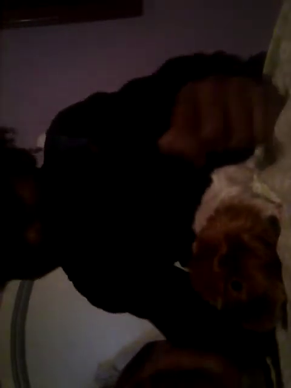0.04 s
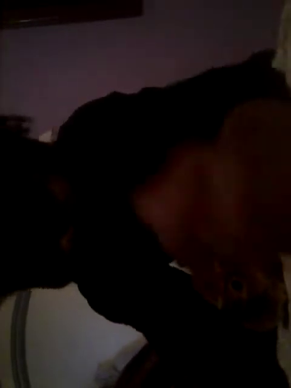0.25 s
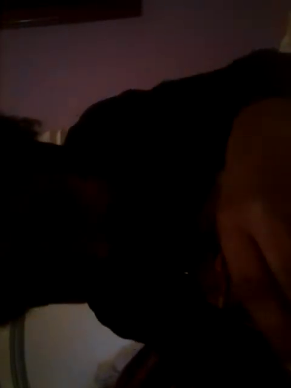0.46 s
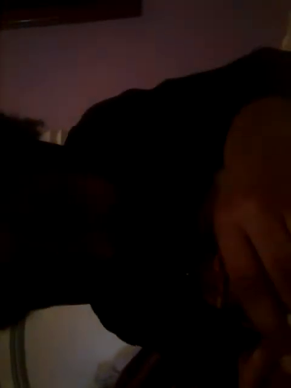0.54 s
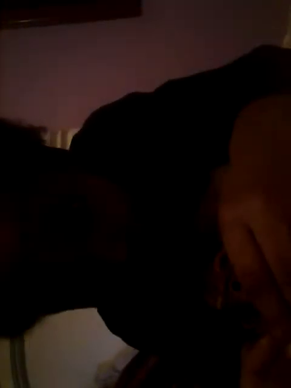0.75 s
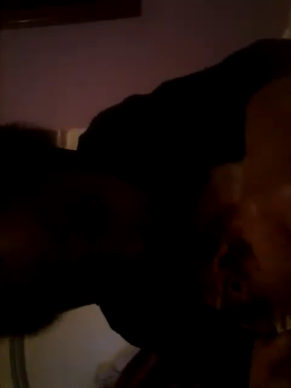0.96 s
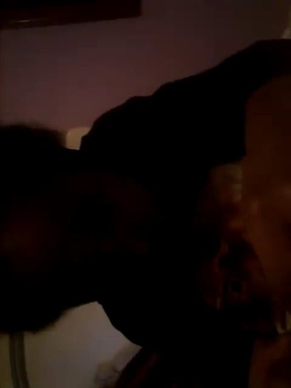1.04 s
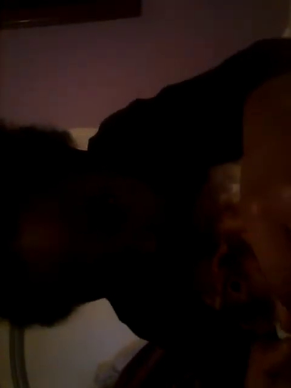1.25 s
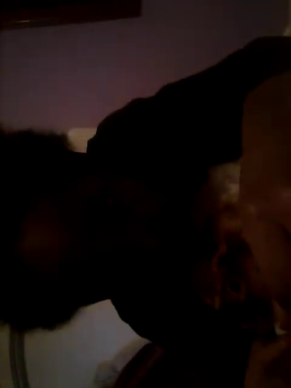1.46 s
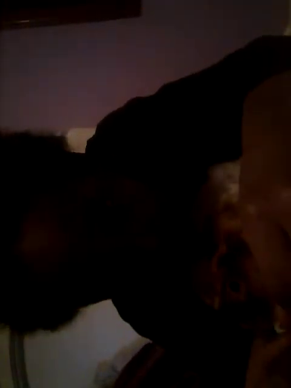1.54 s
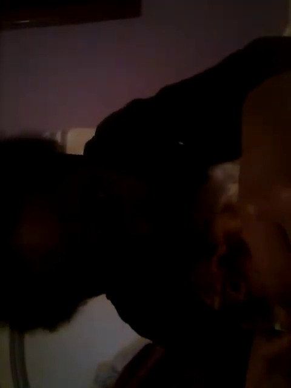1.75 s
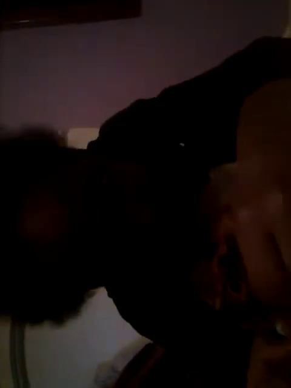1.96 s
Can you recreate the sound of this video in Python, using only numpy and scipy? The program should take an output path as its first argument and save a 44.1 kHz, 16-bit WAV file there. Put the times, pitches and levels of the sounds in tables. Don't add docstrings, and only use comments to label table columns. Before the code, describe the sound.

A guinea pig squeals four rising whistles close to the microphone in a quiet bedroom.

```python
import sys
import numpy as np
from scipy import signal
from scipy.fft import rfft, irfft, next_fast_len
from scipy.io import wavfile
from scipy.ndimage import uniform_filter1d

SR = 44100
rng = np.random.default_rng(int(sys.argv[2]) if len(sys.argv) > 2 else 0)


def how_loud(loudness_db):
    steps = np.asarray(loudness_db, float) / 20
    return 10 ** steps


def unload_audio(sound):
    columns = np.transpose(np.atleast_2d(sound))
    steps = np.round(np.clip(columns, -1, 1) * 32767)
    wavfile.write(sys.argv[1], SR, steps.astype(np.int16))


N = 88376


def at_hz(points, hz):
    table = np.array(points)
    return np.interp(np.log(hz), np.log(table[:, 0]), table[:, 1])


def rms_one(x):
    return x / np.sqrt(np.mean(x ** 2) + 1e-20)


def drift(rate_hz):
    pole = np.exp(-2 * np.pi * rate_hz / SR)
    wander = signal.lfilter([1], [1, -2 * pole, pole * pole], rng.standard_normal(N + SR))
    return rms_one(wander[SR:])


def bump(at_s, width_s):
    return np.exp(-.5 * ((np.arange(N) / SR - at_s) / width_s) ** 2)


def shaped(x, gain_at):
    size = next_fast_len(N + SR)
    hz = np.maximum(np.fft.rfftfreq(size, 1 / SR), 1)
    return irfft(rfft(x, size) * gain_at(hz), size)[..., :N]


# time in seconds, pitch in Hz, level in dB, second partial in dB re first,
# higher partials in dB re first.
CHIRP = [(0.005, 853, -39.5, -24.5, -45.5), (0.018, 770, -48, -18, -37), (.03, 744, -37, -21.5, -32.5),
         (0.04, 787, -44.5, -26, -31), (0.05, 932, -43.5, -15.5, -36.5), (0.056, 926, -41, -23.5, -38.5),
         (.061, 824, -47, -25, -42.5)]
FIRST_LEAD = [(.091, 1024, -35.5, -38, -33), (0.101, 1010, -28.5, -35.5, -36),
              (0.112, 1243, -27, -22.5, -38.5), (0.135, 1321, -23, -18.5, -20)]
FIRST = [(0.136, 1201, -20, -14.5, -21), (0.145, 1200, -21, -15, -22.5), (0.162, 1248, -20, -14.5, -17.5),
         (0.226, 1646, -25, -10, -13.5), (0.243, 1790, -22.5, -23, -18.5), (0.28, 1957, -25, -20.5, -23),
         (0.307, 2029, -23.5, -27, -27), (0.349, 2031, -27.5, -27, -30.5)]
SECOND_LEAD = [(.5155, 1300, -46, -20, -30), (.5185, 1280, -25, -16, -17), (.5198, 830, -32, -4, -11),
               (.5235, 790, -32, 2, -11), (.5275, 815, -30, -1, -12), (.5305, 960, -21, -12, -17)]
SECOND = [(0.531, 991, -18.5, -17.5, -22), (0.546, 995, -15.5, -12, -23.5), (.567, 1146, -16, -17, -36),
          (0.589, 1182, -14.5, -25, -26.5), (0.621, 1381, -15.5, -15.5, -30.5),
          (.642, 1437, -16.5, -18, -30.5), (0.679, 1635, -16.5, -14.5, -19),
          (0.731, 1788, -21.5, -9, -25.5), (.754, 1846, -28, -17, -32.5)]
THIRD_LEAD = [(0.953, 1444, -45.5, -42, -31.5), (.964, 1258, -55, -39.5, -34.5),
              (0.973, 1158, -25.5, -13.5, -30), (0.979, 1210, -25, -22.5, -27.5)]
THIRD = [(0.981, 1217, -22, -15.5, -31.5), (1.011, 1183, -21, -13.5, -24), (1.05, 1194, -20, -13.5, -22.5),
         (1.085, 1238, -20, -11.5, -23.5), (1.111, 1329, -19, -12.5, -19), (1.136, 1548, -19, -11, -16.5),
         (1.167, 1697, -19.5, -16.5, -22), (1.214, 1827, -26, -16, -23), (1.23, 1853, -32, -21, -36)]
FOURTH_LEAD = [(1.553, 1107, -54, -22, -38), (1.574, 1102, -40.5, -37.5, -40),
               (1.575, 1062, -30, -16, -24.5)]
FOURTH = [(1.58, 1061, -24.5, -6, -28), (1.608, 1004, -24, -9.5, -21.5), (1.625, 905, -26, -12.5, -18),
          (1.665, 923.2, -24, -15, -22), (1.706, 1037, -24.5, -10, -30), (1.746, 1193, -29, -7, -28),
          (1.78, 1217, -28, -10.5, -33), (1.827, 1376, -27.5, -14.5, -35.5), (1.847, 1373, -28, -25, -38)]


def larynx():
    release_s, release_db = .014, -19
    snap_s, glide_s = .001, .01
    edge_s = 0.00047
    t = np.arange(N) / SR
    calls = []
    for call in (CHIRP, FIRST_LEAD + FIRST, SECOND_LEAD + SECOND, THIRD_LEAD + THIRD, FOURTH_LEAD + FOURTH):
        release = np.add(call[-1], [release_s, 0, release_db, 0, 0])
        calls.append(list(call) + [release])
    rows = sorted(sum(calls, []), key=lambda row: row[0])
    row_s, *columns = np.transpose(rows)
    curves = [uniform_filter1d(np.interp(t, row_s, c), size=int(snap_s * SR)) for c in columns]
    pitch, level_db, second_db, upper_db = curves
    settled = sum((t > c[0][0] + glide_s) & (t < c[-1][0]) for c in (CHIRP, FIRST, SECOND, THIRD, FOURTH))
    pitch = np.where(settled, uniform_filter1d(pitch, size=int(glide_s * SR)), pitch)
    gate = sum(np.clip(np.minimum(t - c[0][0], c[-1][0] - t) / edge_s, 0, 1) for c in calls)
    return pitch, level_db, second_db, upper_db, gate


# time in seconds, length in seconds, raggedness in dB.
BREAKS = [(.134, .002, -19), (.5187, .001, -20), (.524, .004, -29), (.53, .0015, -21), (.618, .002, -19),
          (.979, .002, -21), (1.577, .0012, -17), (1.616, .004, -19), (1.65, .025, -30), (1.679, .005, -25)]


def voice_breaks():
    return sum(how_loud(db) * bump(at_s, length_s) for at_s, length_s, db in BREAKS)


def period_doubling():
    from_s, to_s, edge_s = 1.616, 1.678, .005
    t = np.arange(N) / SR
    return np.clip(np.minimum(t - from_s, (to_s - t) / 2) / edge_s + .5, 0, 1)


# multiple of the pitch, level in dB re first.
HALF_LINES = [(.5, -27), (1.5, -13), (2.5, -17), (3.5, -25), (4.5, -23), (5.5, -31), (6.5, -43)]


def half_lines(phase, doubled):
    t = np.arange(N) / SR
    sag_db = -250 * np.clip(t - 1.655, 0, 1)
    lines = 0
    for multiple, db in HALF_LINES:
        lines = lines + how_loud(db + 0.93 * drift(40)) * np.cos(multiple * phase)
    return doubled * how_loud(sag_db) * lines


# frequency in Hz, gain in dB.
THROAT = [(2400, -2), (4200, -3.5), (4600, -4.5), (4950, 2), (5600, -5.5), (6200, -17.5), (6900, -24),
          (10500, -42)]
# frequency in Hz, gain in dB.
TOP = [(6100, 0), (6750, -11.5), (7300, -2.5), (8300, 2.5), (9200, -3), (10500, -5)]
# partial, time in seconds, width in seconds, gain in dB.
DIPS = [(2, .6, 0.0051, -14), (2, .628, 0.0075, -31), (2, .712, 0.024, -19), (3, .165, 0.014, -4),
        (3, .21, .025, -3), (3, 0.68, .015, -7.5), (3, 1.73, 0.011, -9.5), (3, 1.7, .012, 8.5),
        (4, 0.547, 0.017, -6), (4, 1.115, 0.01, -12), (4, 1.645, 0.017, -12), (4, 1.7, .015, -7),
        (5, .58, .01, 6), (7, 1.05, .045, 9.5), (5, .19, .015, -12.5), (4, 1.2, .03, 6),
        (6, 1.125, .015, -8.5), (8, .523, .004, 8), (4, .335, .015, -6), (7, .2, .02, 5.5),
        (5, .69, .04, -11.5), (5, 1.4, 0.02025, -8), (6, .18, .012, 6), (5, .533, .004, 4),
        (3, 1.6, .012, 3.5), (4, 0.35, .02, -3), (6, .6, .03, -5.5), (5, 0.88, 0.041, -9),
        (6, .524, 0.0048, 8), (7, .524, .005, 11), (10, .521, .003, 24), (11, .525, .003, 30),
        (12, .521, .002, 35)]


def cavity_db(partial):
    return sum(db * bump(at_s, width_s) for which, at_s, width_s, db in DIPS if round(which) == partial)


def overtones(phase, pitch, second_db, upper_db, doubled):
    second_db = second_db - 4.5 * doubled + cavity_db(2)
    over = how_loud(second_db) * np.cos(2 * phase)
    for k in range(3, 13):
        db = upper_db - 3.5 * (k - 4)
        if k > 3:
            db = db - 9 * doubled
        db = db + at_hz(THROAT, k * pitch) + at_hz(TOP, k * pitch)
        db = db + cavity_db(k) + 1.1 * drift(30)
        lag = 2.6 * (k - 1) * (k - 2) / 2
        over = over + how_loud(db) * np.cos(k * phase - lag)
    return over


# frequency in Hz, density in dB per Hz.
AIR = [(500, -6.5), (1200, 7), (3000, -3.5), (5000, -4.5), (6500, -12.5), (10000, -38)]


def breath(ragged):
    air = rms_one(shaped(rng.standard_normal(N), lambda hz: how_loud(at_hz(AIR, hz))))
    return (how_loud(-36.5) + 0.074 * ragged) * air


def squeals():
    jitter, shimmer_db = .0012, .12
    pitch, level_db, second_db, upper_db, gate = larynx()
    phase = 2 * np.pi * np.cumsum(pitch * (1 + jitter * drift(90))) / SR
    doubled = period_doubling()
    ragged = voice_breaks()
    over = overtones(phase, pitch, second_db, upper_db, doubled) + half_lines(phase, doubled)
    voice = np.cos(phase) * (1 + ragged * drift(200))
    voice = voice + over * (1 + 3.5 * ragged * drift(300))
    loud = gate * how_loud(level_db + shimmer_db * drift(90))
    return loud * (np.sqrt(2) * voice + breath(ragged))


# time in seconds, length in seconds, centre in Hz, level in dB.
RUSTLES = [(.05, .011, 1500, -59), (.04, .018, 2500, -61), (.402, .007, 5300, -66), (.405, .01, 1000, -57),
           (.514, .002, 4900, -60), (.956, .002, 3500, -60), (.853, .002, 3500, -62),
           (1.5765, .0007, 3000, -47), (1.5765, .0007, 5500, -62), (.979, .0015, 4000, -54),
           (.979, .0015, 1900, -50)]


def rustles():
    sharpness = 4.5
    white = rng.standard_normal(N)
    out = 0
    for at_s, length_s, centre_hz, db in RUSTLES:
        puff = shaped(white, lambda hz: np.exp(-(np.log(hz / centre_hz) * sharpness) ** 2))
        out = out + how_loud(db) * bump(at_s, length_s) * rms_one(puff)
    return out * how_loud(3 * drift(150))


# frequency in Hz, left over right in dB.
PORT_BALANCE = [(500, -0.5), (1000, -1.5), (1300, 1), (1850, 3.5), (2600, 0), (4000, 1.5), (6000, 7)]
# frequency in Hz, left's lead in radians.
PORT_LEAD = [(500, .5), (1200, 0.64), (2500, .7), (4200, .9), (4700, 1.8), (5600, .6), (8000, .8)]


def ports(x):
    def response(hz, sign):
        level = how_loud(sign * at_hz(PORT_BALANCE, hz) / 2)
        return level * np.exp(.5j * sign * at_hz(PORT_LEAD, hz))

    def side(sign):
        return shaped(x, lambda hz: 2 * response(hz, sign) / np.abs(response(hz, 1) + response(hz, -1)))

    return np.array([side(1), side(-1)])


# frequency in Hz, gain in dB.
WALLS = [(900, 0.5), (1350, 0), (1800, 5.5), (4000, 8), (7000, 5)]
# frequency in Hz, 60 dB decay in seconds, level in dB.
ROOM_RINGS = [(2030, 1.15, -17), (1368, .6, -12), (1785, .45, -20), (1845, .33, -22)]


def bedroom(x):
    t60_s, level_db, rise_s = .4, -26, .02
    t = np.arange(SR // 2) / SR
    tail = rng.standard_normal((2, len(t))) * how_loud(-60 * t / t60_s) * np.clip(t / rise_s, 0, 1)
    tail = shaped(tail, lambda hz: how_loud(at_hz(WALLS, hz)))[:, :len(t)]
    tail = how_loud(level_db) * tail * np.sqrt(2 * np.log(1000) / (t60_s * SR) * 2)
    for hz, ring_s, db in ROOM_RINGS:
        ring = how_loud(db - 60 * t / ring_s) * np.sin(2 * np.pi * hz * t)
        tail = tail + ring * 2 * np.log(1000) / (ring_s * SR)
    return signal.fftconvolve(tail, x[None], axes=1)[:, :N]


# frequency in Hz, left-right likeness from -1 to 1.
LIKENESS = [(40, 0.015), (130, 0.99), (290, 0.84), (640, 0.49), (1400, -0.69), (3000, 0.23), (15000, -1.5)]


def stereo_noise(gain_at):
    def alike(hz):
        return np.clip(at_hz(LIKENESS, hz), -1, 1)

    mid, side = rng.standard_normal((2, N))
    mid = shaped(mid, lambda hz: gain_at(hz) * np.sqrt(1 + alike(hz)))
    side = shaped(side, lambda hz: gain_at(hz) * np.sqrt(1 - alike(hz)))
    return np.array([mid + side, mid - side])


# frequency in Hz, density in dB per Hz.
FAN = [(300, -1), (600, -0.5), (1500, -2), (2500, -8.5), (4000, -13), (5200, -14.5), (5800, -23),
       (7000, -32.5)]
# frequency in Hz, width in Hz, level in dB.
FAN_TONES = [(55, 8.6, -72.5), (117.7, 9.1, -62), (199, 45, -62.5), (239.1, 20, -56.5), (267.6, 12, -56.5),
             (440, 14, -66.5)]


def fan():
    rumble = [(28, -35), (45, -16), (100, -10.5), (160, -3.5), (300, -6.0)]  # Hz, dB per Hz
    rush = stereo_noise(lambda hz: how_loud(at_hz(FAN, hz)) * (hz > 300) * (hz < 7000))
    low = stereo_noise(lambda hz: how_loud(at_hz(rumble, hz)) * (hz < 300))
    out = how_loud(-53) * rms_one(rush) + how_loud(-58) * rms_one(low)
    for tone_hz, width_hz, db in FAN_TONES:
        tone = stereo_noise(lambda hz: 1 / (1 + (2 * (hz - tone_hz) / width_hz) ** 2))
        out = out + how_loud(db) * rms_one(tone)
    return out * how_loud([[-.8], [.8]])


def scene():
    pig = squeals() + rustles()
    return ports(pig) + bedroom(pig) + fan()


def microphone_hiss():
    white = rng.standard_normal((2, N))
    return how_loud(-70) * rms_one(shaped(white, lambda hz: np.clip(hz / 6000, 0, 1) ** 2))


def band_limit(x):
    return signal.sosfilt(signal.butter(12, 16550, fs=SR, output="sos"), x)


def record(dry):
    mix = shaped(dry + microphone_hiss(), lambda hz: 1. * (hz < 15720))
    return band_limit(mix)


dry = scene()
out = record(dry)
unload_audio(out)
```